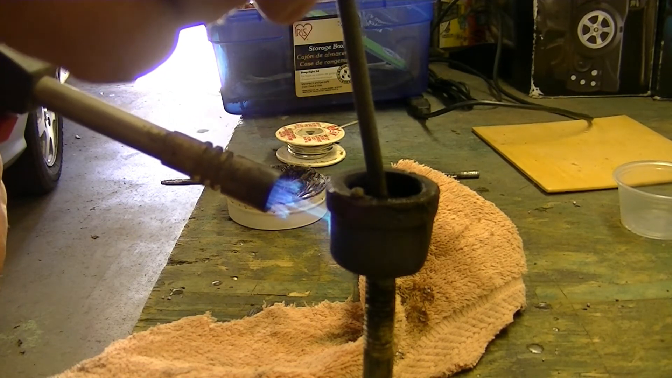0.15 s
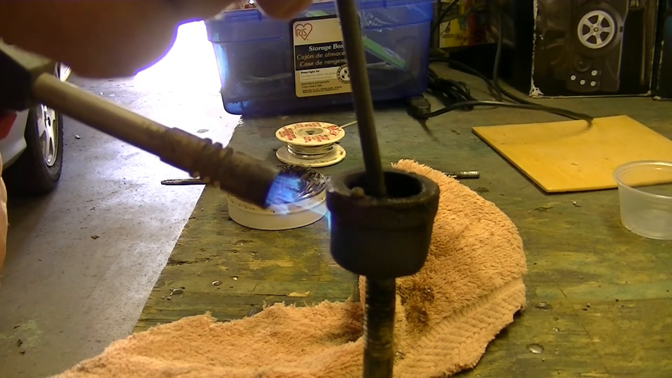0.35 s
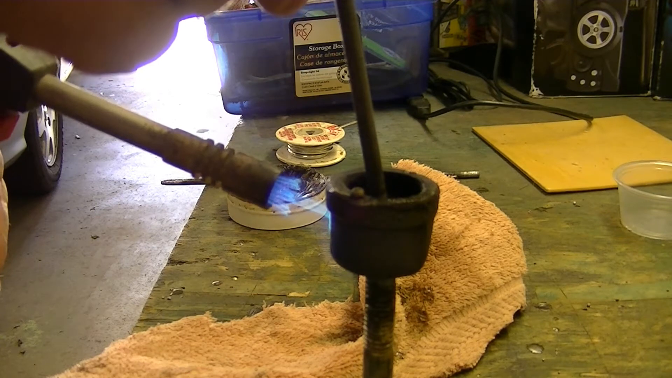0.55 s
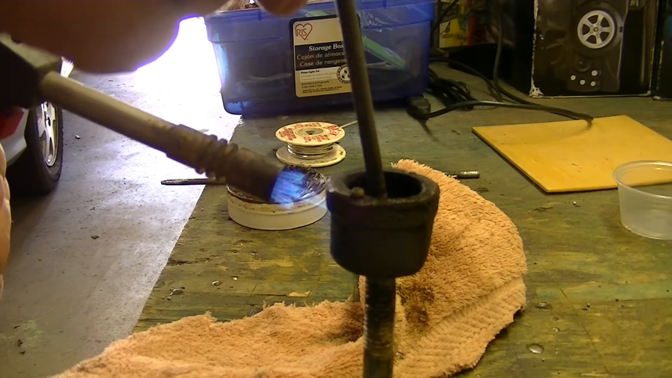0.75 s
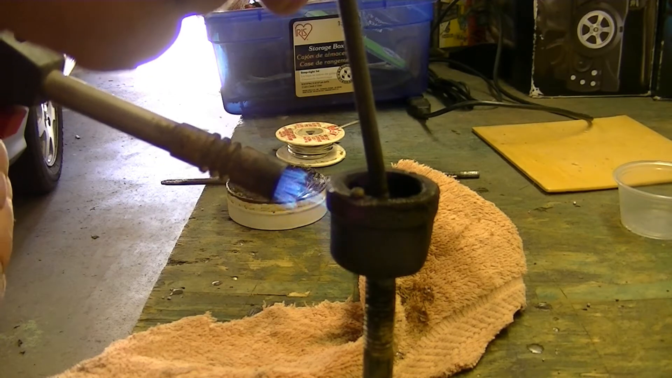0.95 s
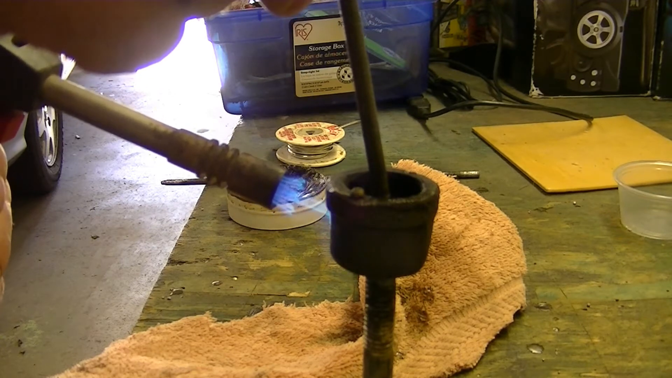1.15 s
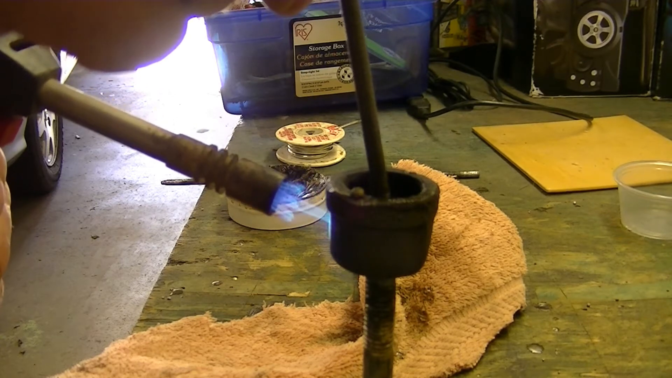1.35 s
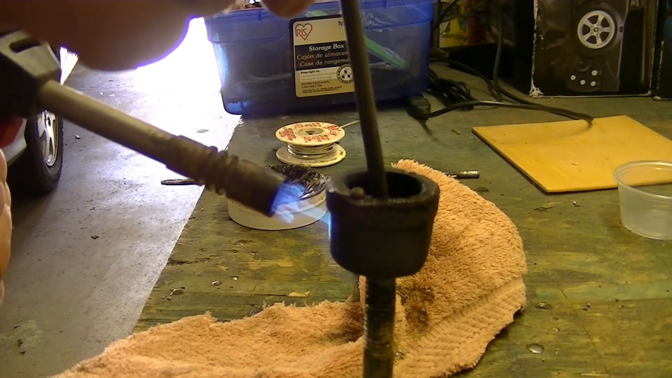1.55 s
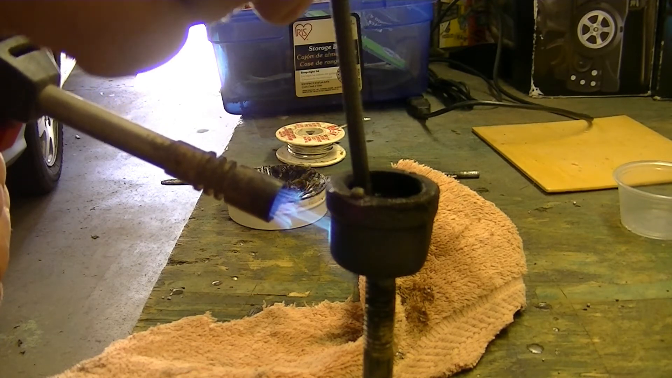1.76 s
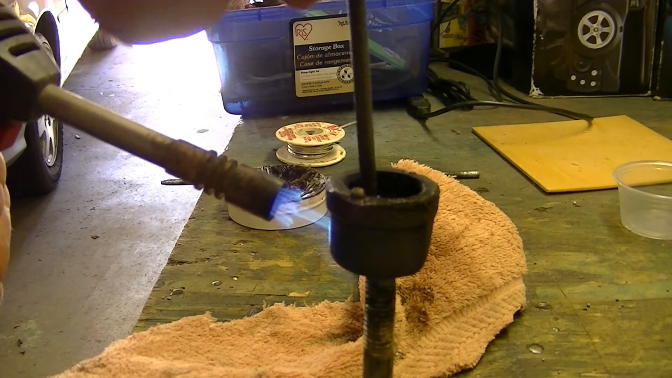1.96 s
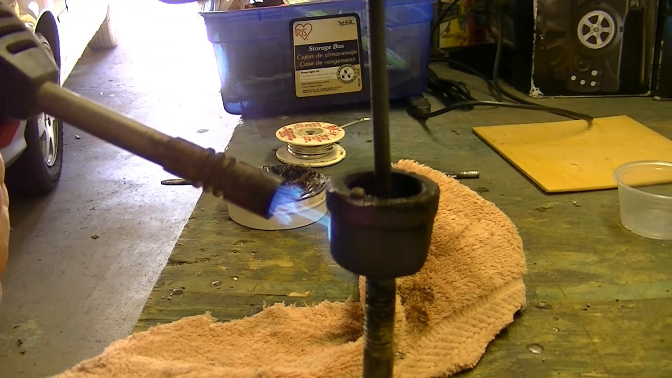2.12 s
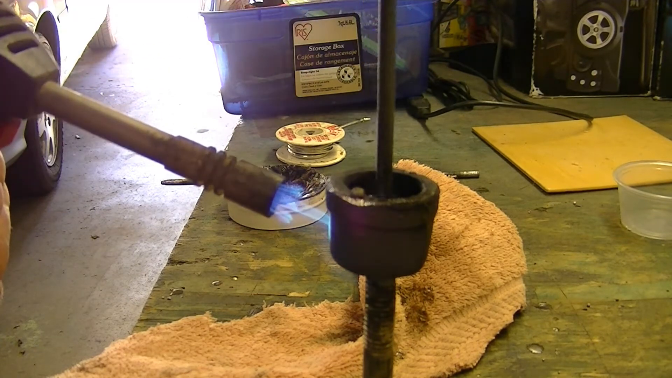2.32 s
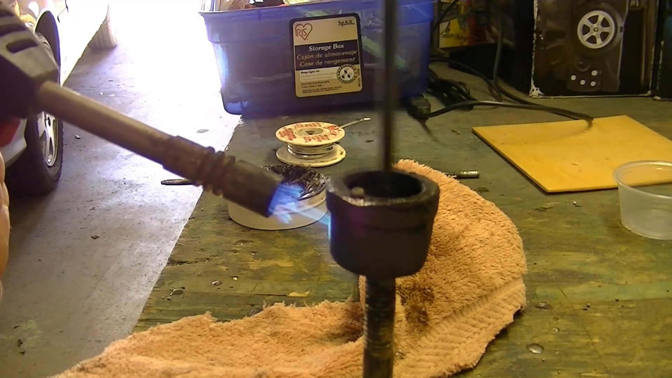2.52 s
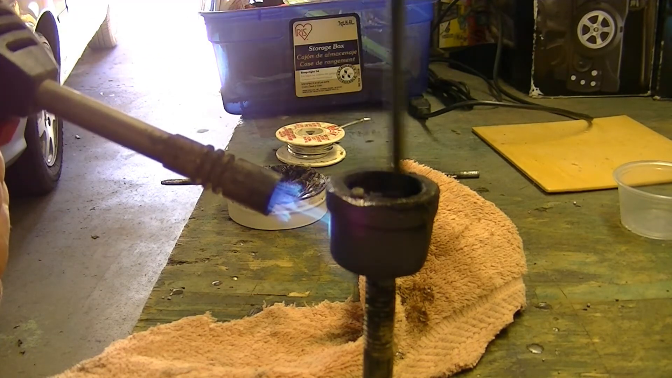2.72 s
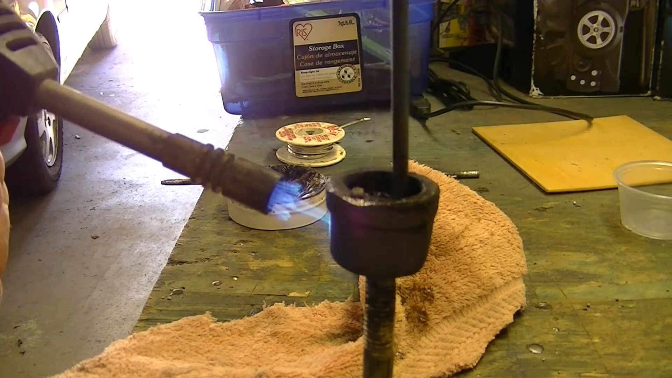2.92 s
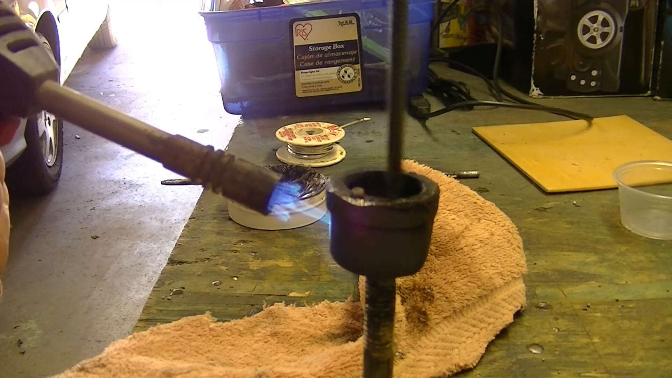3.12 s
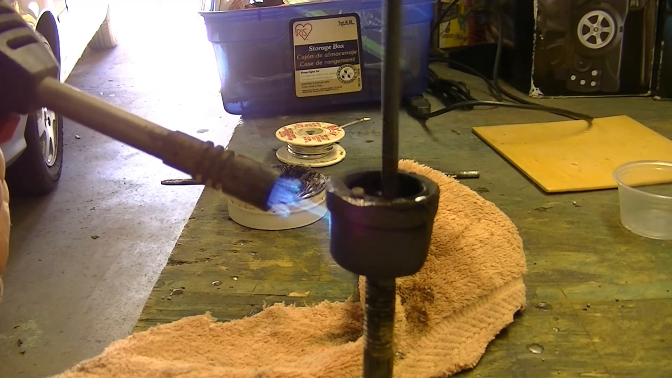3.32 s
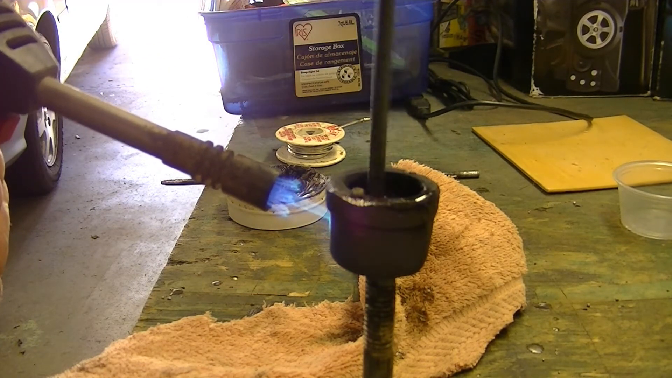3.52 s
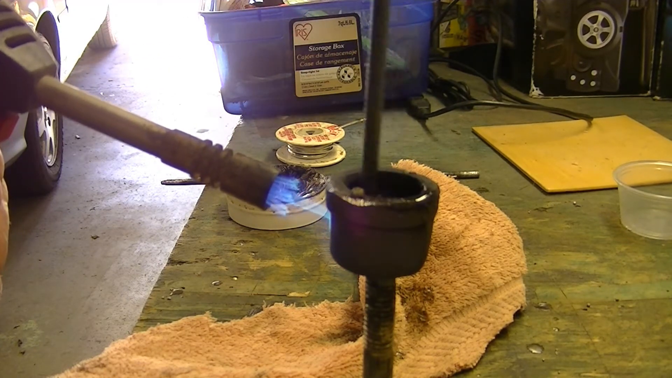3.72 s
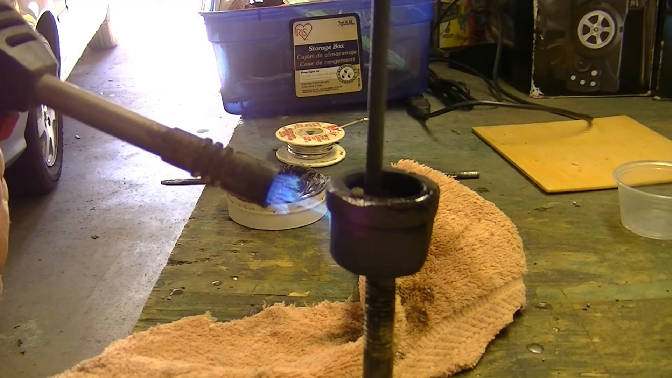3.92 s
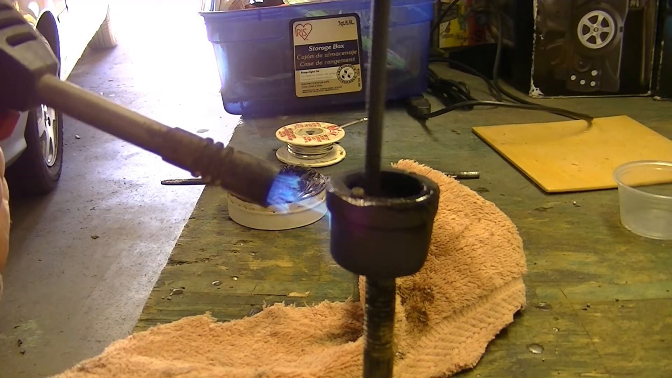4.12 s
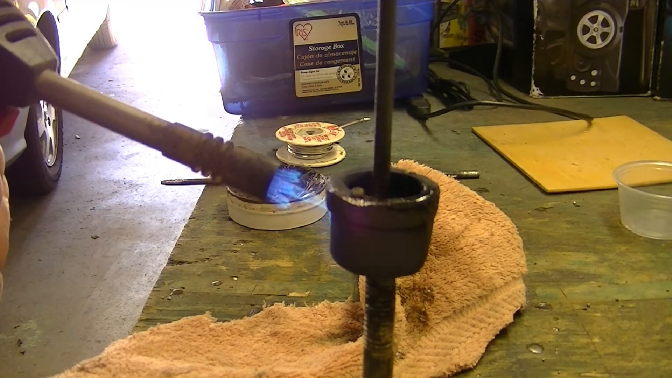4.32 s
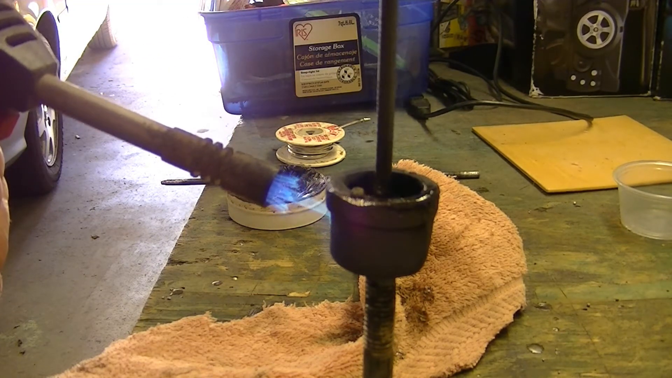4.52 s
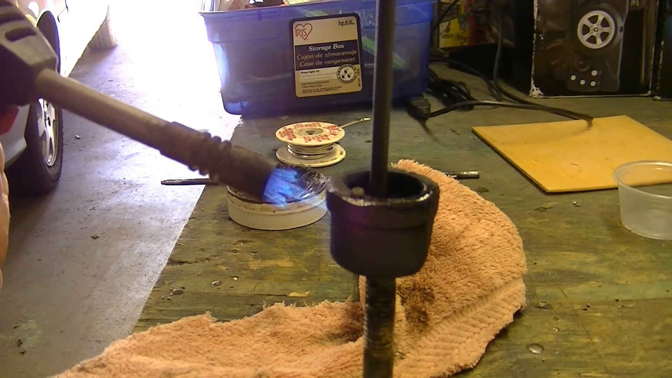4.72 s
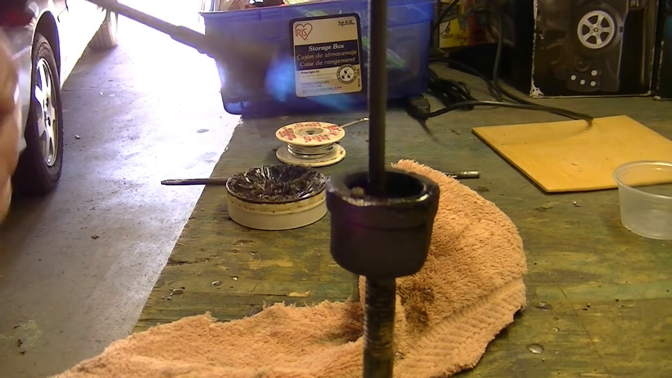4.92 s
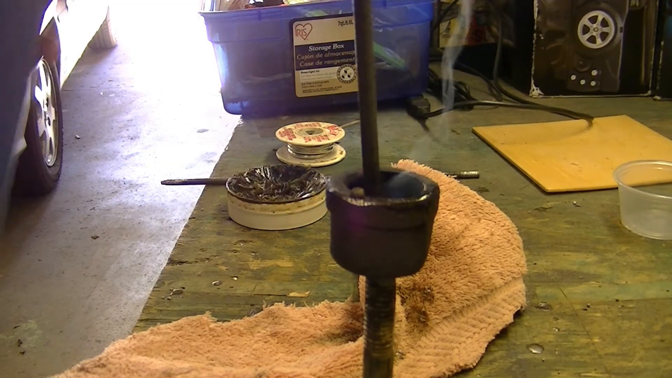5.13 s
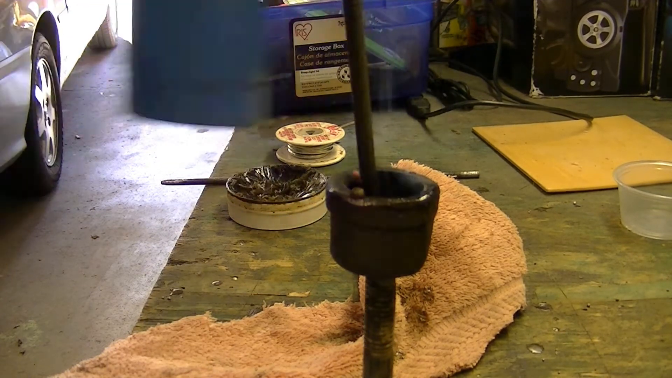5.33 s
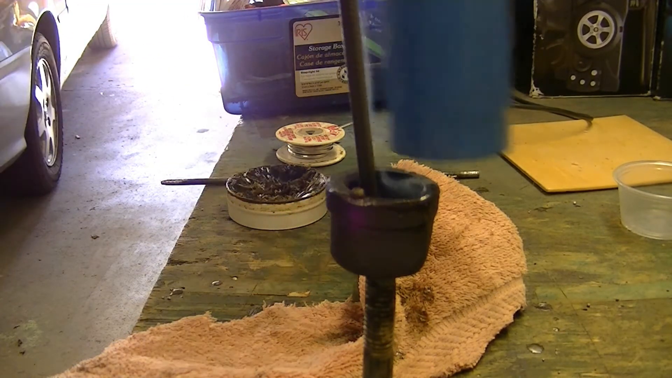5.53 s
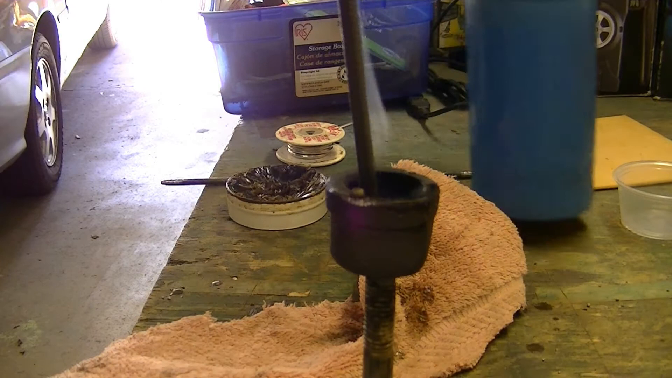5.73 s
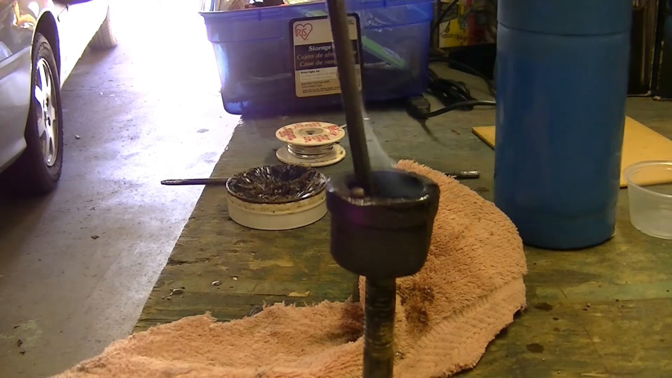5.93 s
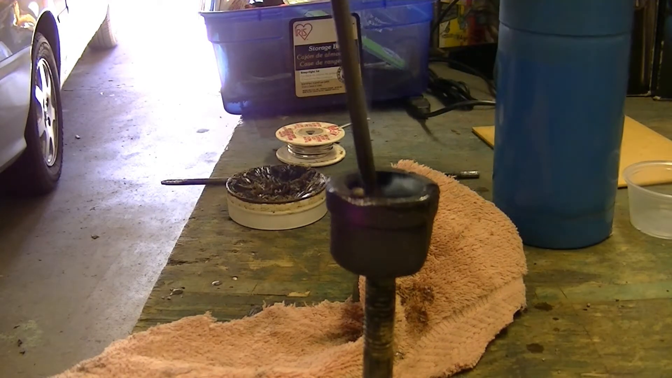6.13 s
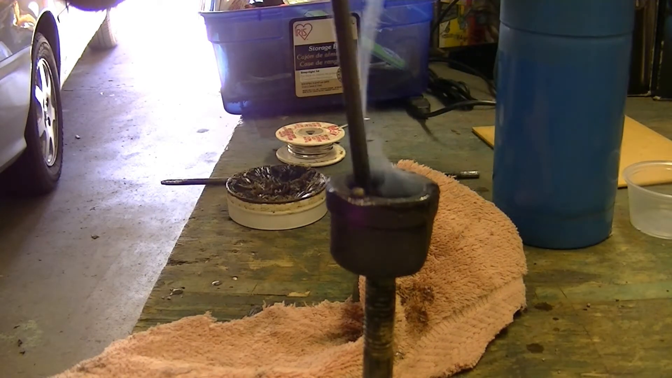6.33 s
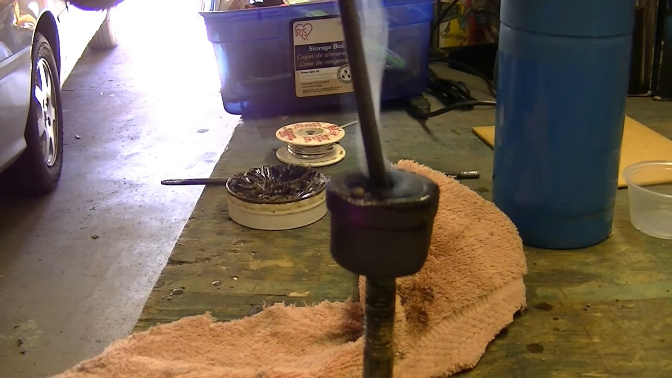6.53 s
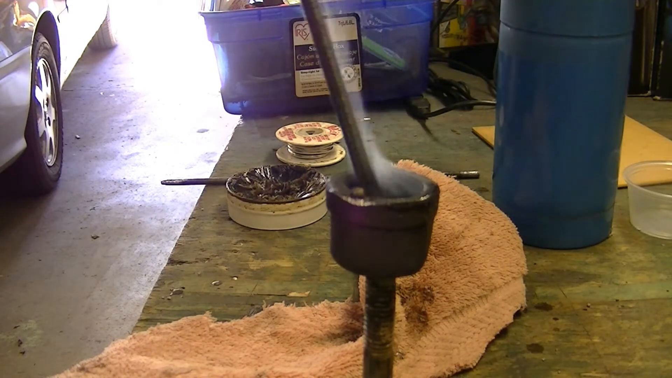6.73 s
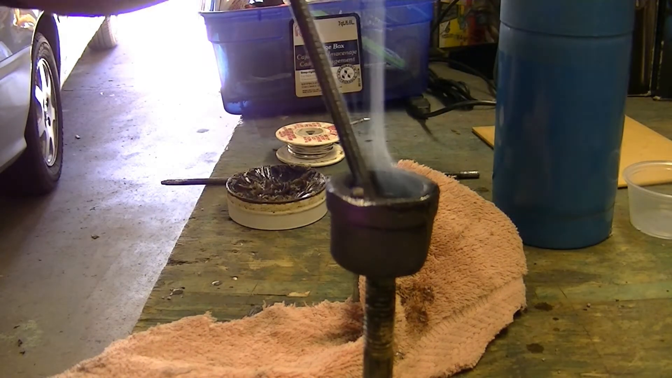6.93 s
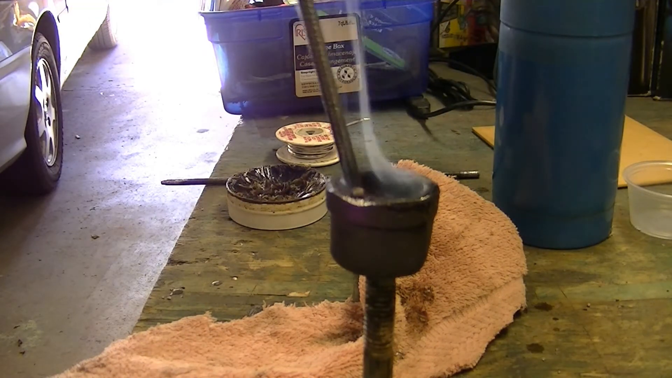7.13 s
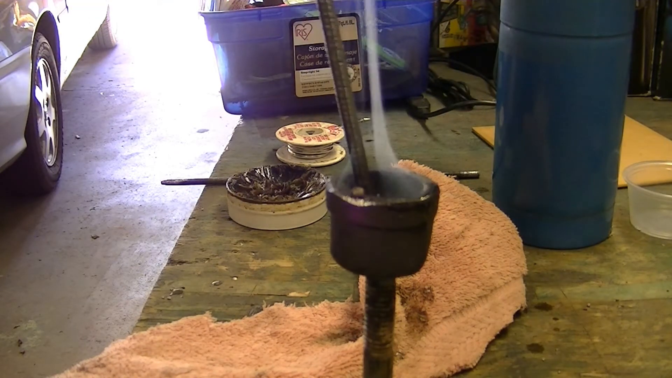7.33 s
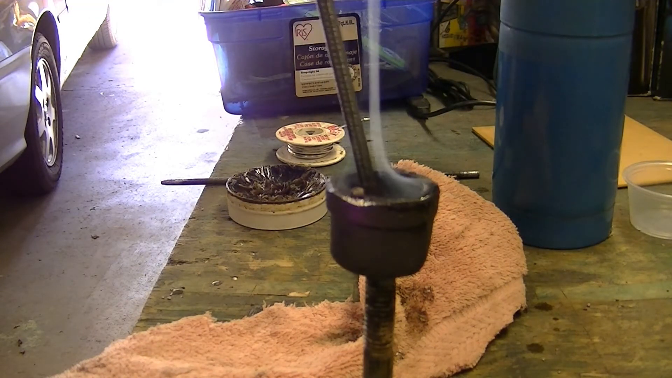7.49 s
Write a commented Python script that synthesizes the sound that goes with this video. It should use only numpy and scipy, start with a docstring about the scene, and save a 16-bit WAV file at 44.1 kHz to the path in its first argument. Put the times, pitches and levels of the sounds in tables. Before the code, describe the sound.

Steady but ragged burner roar, mid-heavy, crackling with irregular pops, one soft low bump partway. Then the hiss brightens and sweeps down in pitch as the torch is carried rightward, the roar thinning. A hard clack of metal on wood rocks quickly to rest. The burner keeps blowing at lower level, slightly wavering, with soft bench taps and tiny high sizzles from hot metal. Heard near the bench in stereo, with short workshop echo and faint microphone hiss.

```python
"""Gas torch and hot crucible

A gas torch roars and sputters against a small metal crucible on a workbench, with one soft bump.
Still burning, it is swung past the microphone and its bottle is stood on the bench with a rocking knock.
It burns on more quietly to the right, with a few soft bumps; now and then the hot metal ticks.
Flame and jet are coloured noise with pops, the knocks are short pushes that set the bench ringing,
and the ticks are short bursts of high noise."""
import sys
import numpy as np
from scipy import signal
from scipy.fft import rfft, irfft
from scipy.io import wavfile
from scipy.ndimage import map_coordinates

SR = 44100
rng = np.random.default_rng(int(sys.argv[2]) if len(sys.argv) > 2 else 0)


def dump_mix(stems):
    """Bounce the given channels to the path in sys.argv[1] as a 16-bit WAV at rate SR."""
    frames = np.atleast_2d(stems).T  # one column per channel
    limited = np.clip(frames, -1, 1)  # hard clip at full scale
    pcm = np.round(limited * 32767).astype(np.int16)
    wavfile.write(sys.argv[1], SR, pcm)


N = 333396
TIME = np.arange(N) / SR
TAPS = 4096  # length of the colouring filters, samples
BINS = np.fft.rfftfreq(TAPS, 1 / SR)  # their frequencies, Hz
MS = 1e-3  # seconds in a millisecond

# the torch's path, place 0 at the crucible, 1 in mid-air, 2 standing: t/s, place, left minus right/dB
PATH = [(4.78, 0, -0.5), (5.0, 0.33, -0.5), (5.2, 1, -2.5), (5.58, 1, -5), (5.78, 1.8, -3), (5.95, 1.9, -4)]
# loudest pops of the flame: t/s, strength/dB
POPS = [(0.169, -12.5), (0.3111, -17.5), (0.3533, -12), (0.391, -16), (0.409, -18), (0.57, -19),
        (0.6648, -17), (0.7127, -15), (0.7838, -15), (1.268, -11.5), (1.348, -12), (1.3952, -16),
        (1.4365, -16), (1.6355, -14), (1.6827, -14.5), (1.76, -18), (1.952, -11), (2.0945, -14),
        (2.14, -13), (2.5505, -14), (2.6155, -16), (2.655, -15.5), (2.7513, -12.5), (2.784, -15),
        (2.8559, -14.5), (3.109, -16), (3.2687, -14.5), (3.2906, -18), (3.438, -19), (3.88, -17),
        (4.338, -14), (4.405, -15.5), (4.586, -14), (4.6698, -13), (4.8718, -18.5), (5.059, -20.5),
        (5.1223, -20), (5.134, -20.5), (5.22, -23), (5.268, -23), (6.8793, -22)]
# the flame flares up with a burst of crackle: t/s, rise/dB
FLARES = [(0.022, 1.5), (0.192, 4), (0.361, 4), (0.41, 0), (0.469, 2), (0.573, 4.5), (0.785, 4), (1.137, 3),
          (1.19, 1.5), (1.249, 2), (1.395, 0.5), (1.442, 5.5), (1.956, 2), (1.996, 4.5), (2.3, 2.5),
          (2.341, 4), (2.453, 1.5), (2.49, 3), (2.657, 1), (2.907, 2.5), (2.99, 3.5), (3.111, 3.5),
          (3.38, 2.5), (3.808, 4.5), (4.183, 2.5), (4.222, 4), (4.59, 3.5), (4.773, 4), (5.059, 3),
          (5.127, 0), (5.167, 3.5), (5.222, 5.5), (6.708, 4), (6.96, 3), (7.274, 1.5)]
FLARE_S = 0.0096  # half length
# what slides as the torch is lifted and lowered, two resonances and a hollow band:
# t/s, low resonance f/Hz, high resonance f/Hz, hollow f/Hz
SLIDE = [(4.92, 460, 2160, 5850), (5.05, 474, 1980, 5660), (5.17, 493, 1420, 4800), (5.3, 550, 1430, 3900),
         (5.42, 600, 1470, 3650), (5.56, 640, 1520, 3750), (5.7, 710, 1750, 3800), (5.85, 710, 1830, 3750)]


def gain_of(db):
    """Turns decibels into a factor."""
    return 10 ** (np.asarray(db) / 20)


def evened(x):
    """Scales a sound to an average strength (rms) of 1."""
    return x / np.sqrt(np.mean(x ** 2) + 1e-20)


def read(points, hz):
    """Reads a table of values along a logarithmic frequency axis."""
    f, value = np.transpose(points)
    return np.interp(np.log(hz + 1), np.log(f + 1), value)


def follow(rows):
    """Gives each column of a table over time, at every sample."""
    s, *columns = np.transpose(rows)
    return [np.interp(TIME, s, c) for c in columns]


def add(mix, s, sound):
    """Adds a short sound at time s."""
    part = mix[round(s * SR):][:len(sound)]
    part += sound[:len(part)]


def bumps(rows):
    """Bell-shaped peaks and notches along the frequency axis, in dB."""
    return sum(db * np.exp(-((BINS - hz) / width) ** 2) for hz, width, db in rows)


def swells(rows, half_s):
    """Brief bell-shaped changes of level over time, in dB."""
    return sum(db * np.exp(-np.minimum(((TIME - s) / half_s) ** 2, 20)) for s, db in rows)


def ring(db):
    """Makes an impulse response with the given spectrum that starts as promptly as possible."""
    mirrored_db = np.r_[db, db[-2:0:-1]]
    log_gain = np.log(gain_of(mirrored_db))
    return np.fft.ifft(np.exp(np.conj(signal.hilbert(log_gain)))).real


def colour(x, response):
    """Passes one or two channels through an impulse response."""
    return signal.oaconvolve(np.atleast_2d(x), np.atleast_2d(response), axes=1)[:, :N]


def delayed(x, ms):
    """Delays a sound by a time that may move."""
    return map_coordinates(x, [np.arange(N) - ms * MS * SR], order=3, mode="nearest")


def resonate(x, hz, width_hz):
    """A resonance of gain 1 that follows the curve hz."""
    # shift the moving pitch down to zero, smooth there, and shift it back
    turn = np.exp(2j * np.pi * np.cumsum(hz) / SR)
    r = np.exp(-np.pi * width_hz / SR)
    return 2 * (turn * signal.lfilter([1 - r], [1, -r], x / turn)).real


def eddies(slow_hz, fast_hz):
    """Random unsteadiness, mostly between two rates, with an rms of 1."""
    f = np.fft.rfftfreq(N, 1 / SR)
    no_drift = f ** 2 / (f ** 2 + slow_hz ** 2)
    fading = np.sqrt((1 + f / slow_hz) * (1 + (f / fast_hz) ** 4))
    return evened(irfft(rfft(rng.standard_normal(N)) * no_drift / fading, N))


def turbulence():
    """Noise of churning gas, common to both ears plus a diffuse part of their own."""
    # how strong the diffuse part is: f/Hz, level/dB
    diffuse = [(50, -10), (250, -29.5), (700, -11), (1400, -3.5), (2800, -1.5), (5000, -6), (9000, -0.5),
               (12000, -13), (15000, -30)]
    own = colour(rng.standard_normal((2, N)), ring(read(diffuse, BINS)))
    return evened(rng.standard_normal(N) + own)


def shares():
    """How much of each of the three places is heard; the squares sum to 1."""
    place = follow(PATH)[0]
    return [np.sqrt(np.clip(1 - abs(place - k), 0, 1)) for k in range(3)]


def placed(spectrum, peaks):
    """Colour of a roar or hiss at the left and the right ear for one place."""
    hz, width, db, side_db = np.transpose(peaks)
    ears = []
    for side in (1, -1):
        peaks_db = bumps(zip(hz, width, db + side * side_db / 2))
        ears.append(ring(read(spectrum, BINS) + peaks_db))
    return np.array(ears) * np.sqrt(2) / np.linalg.norm(ears)


def burning():
    """The flame's strength: it flares and falters now and then, and swells just after each large pop."""
    # strength of the flame as heard, sinking as the torch is carried off: t/s, level/dB
    blaze = [(0, -37), (0.7, -37.4), (1.0, -40), (1.17, -37), (2.2, -38), (2.9, -37), (4.79, -37.5),
             (4.86, -43.5), (4.94, -38), (5.06, -42), (5.22, -42.5), (5.35, -46), (5.5, -44.5),
             (5.72, -44.5), (6.2, -44.5), (6.55, -42.5), (6.85, -43.9), (7.56, -43)]
    # the flame briefly falters: t/s, change/dB
    lulls = [(0.11, -3), (0.285, -1.5), (0.43, -4.5), (0.6, -4.5), (0.645, -3.5), (1.05, -2), (1.71, -2.5),
             (2.07, -4), (2.265, -5), (2.42, -4), (3.155, -0.5), (3.245, -4), (3.7, -2), (3.905, -3.5),
             (4.56, -3.5), (4.62, -3.5), (4.88, -3), (5.295, 0), (5.475, -1.5), (5.55, -1.5), (5.82, -3.5),
             (5.99, -1.5), (6.38, -5), (6.63, -3.5)]
    lull_s = 0.016  # half length
    afterburn_db, afterburn_s = 0.5, 0.0033
    db, = follow(blaze)
    afterburn = sum(afterburn_db * (TIME >= s) * np.exp(-abs(TIME - s) / afterburn_s) for s, _ in POPS)
    return gain_of(db + swells(lulls, lull_s) + swells(FLARES, FLARE_S) + afterburn)


def smeared(x, spacing_ms=0.4, smear=0.46):
    """Spreads each pop into a short ragged crackle without changing its colour."""
    turn = np.exp(-2j * np.pi * np.fft.rfftfreq(N, 1 / SR) * spacing_ms * MS)
    return irfft(rfft(x) * (smear + turn) / (1 + smear * turn), N)


def sliding(x):
    """Lifts the two resonances that move with the torch."""
    # width of the low and the high resonance: f/Hz
    widths_hz = (160, 210)
    # strength of the low and the high resonance: level/dB
    strengths_db = (-0.5, 2.5)
    curves = zip(follow(SLIDE), widths_hz, strengths_db)
    return x + sum(gain_of(db) * resonate(x, hz, width) for hz, width, db in curves)


def flame(flutter_db=3.0, sputter_db=-7.0, sputter_per_s=480, spread_db=3.5, pop_db=1.5, calm=0.82,
          crackle_per_flare=0.46, aimed_db=-0.5, swung_db=-3.5, standing_db=0):
    """Eddies make the burning surge; pockets of gas go off as small sharp pops."""
    # roar against the crucible, in mid-air and with the bottle standing: f/Hz, level per Hz/dB
    roar_aimed = [(30, -65), (85, -38), (160, -27), (270, -12.5), (370, -10), (450, -1), (600, -1),
                  (900, -2), (1200, -10), (2100, -10.5), (2700, -15), (3400, -23.5), (5000, -37),
                  (14000, -51)]
    roar_swung = [(30, -47), (85, -32), (160, -17), (330, -4.5), (470, 2), (750, -1.5), (1000, -5.5),
                  (1500, -1.5), (2100, -6.5), (3300, -10.5), (5000, -21), (9000, -30), (14000, -42)]
    roar_standing = [(30, -42), (85, -37), (140, -19.5), (320, -11), (520, -4), (720, -1), (900, -7),
                     (1150, -15), (1400, -10.5), (1900, -6.5), (2350, -16), (3400, -18.5), (4800, -28.5),
                     (14000, -54)]
    # peaks and notches from burner tube and nearby surfaces: f/Hz, width/Hz, level/dB, left minus right/dB
    aimed_peaks = [(304, 28, 3, -6.5), (463, 38, 4, -4.5), (610, 24, -4, -12), (670, 65, -0.5, 9.5),
                   (1062.5, 35, -21, -21), (1234, 31, 6, 3.5), (1387, 87, -8, -2), (1450, 41, 8, -1),
                   (1717, 41, -13.5, 8), (2032, 82, 4, 1), (2350, 27, 2, 3), (3200, 47, 3, -6)]
    swung_peaks = [(393, 34, -9, 4), (1130, 120, 0, -2), (2580, 210, -8.5, 0), (3130, 210, 2, -1),
                   (3820, 220, -1, -3), (4650, 220, 0.5, -10)]
    standing_peaks = [(409, 34, -19.5, -5), (476, 38, 3.5, -2), (540, 38, -12.5, 7), (620, 57, 2, 7.5),
                      (800, 62, -1, 16.5), (1050, 76, -1.5, -13), (1352, 91, 10.5, -5.5), (1510, 110, 0, 6),
                      (1806, 120, -0.5, -11), (2240, 110, -1.5, 7), (2615, 90, 7.5, -2),
                      (2880, 120, -8.5, -7), (3410, 114, 4.5, -11), (3700, 160, -6.5, -6),
                      (4000, 110, 1.5, -10)]
    # pops are brighter than the roar: f/Hz, level/dB
    snap = [(400, -2), (1500, 3.5), (3000, 6), (4200, 10.5), (5400, 13.5), (7000, 8.5), (13000, 3)]

    aimed, swung, standing = shares()
    level = burning()
    unrest = calm + (1 - calm) * aimed  # a free flame burns more evenly
    surge = evened(gain_of(flutter_db * unrest * eddies(27, 140)))

    sizes = gain_of(spread_db * np.minimum(rng.exponential(1, N), 2.8))
    pockets = sizes * (rng.random(N) < sputter_per_s / SR)
    crackle = gain_of(crackle_per_flare * swells(FLARES, FLARE_S))  # extra dB per dB of flare
    pops = gain_of(sputter_db) * evened(pockets) * np.sqrt(surge) * level * unrest * crackle
    rebound_s = 0.0004  # longest wait
    for s, db in POPS:
        size = gain_of([db + pop_db])
        add(pops, s, -size / 2)  # a large pocket swells first, then collapses
        add(pops, s + rebound_s * rng.uniform(0.41, 1), size)

    # a collapsing pocket pulls the pressure down, hence the minus
    drive = turbulence() * surge * level - colour(smeared(pops), ring(read(snap, BINS)))
    at_crucible = colour(drive, placed(roar_aimed, aimed_peaks))
    in_air = sliding(colour(drive, placed(roar_swung, swung_peaks)))
    on_bench = colour(drive, placed(roar_standing, standing_peaks))
    return (aimed * gain_of(aimed_db) * at_crucible
            + swung * gain_of(swung_db) * in_air
            + standing * gain_of(standing_db) * on_bench)


def jet(aimed_db=6, turned_db=2.0, standing_db=4.0, flutter_db=0.77, drift_db=0.6, beam=9):
    """Gas hisses through the nozzle, whose narrowly beamed resonances weaken as soon as it points away."""
    # strength of the jet as heard, peaking as the nozzle sweeps past: t/s, level/dB
    strength = [(0, -59), (3.3, -58.5), (4.84, -55.5), (4.95, -52), (5.08, -56.5), (5.45, -60),
                (5.65, -59.5), (7.56, -58)]
    # hiss aimed at the crucible, and turned away: f/Hz, level per Hz/dB
    hiss_aimed = [(500, -23), (2500, -6), (4000, -10), (5500, -3.5), (7500, 4.5), (9500, 5.5),
                  (11000, -8.5), (13000, -17.5), (14200, -4.5), (15200, -1)]
    hiss_turned = [(500, -25), (2500, -1), (4000, -0.5), (6000, 2.5), (7800, 1.5), (9800, -0.5),
                   (11000, -4), (13000, -23), (14200, -23), (15500, -22)]
    # peaks and notches from the bench once the bottle stands: f/Hz, width/Hz, level/dB, left minus right/dB
    hiss_peaks = [(4540, 130, -1, -3), (5600, 510, 1.5, -5.5), (6340, 250, 1, 14), (7050, 240, -0.5, -9),
                  (7800, 300, 5.5, 3), (8440, 110, -6, 8), (8450, 200, 0, -8), (9120, 83, 5, -6),
                  (9600, 320, -0.5, -9), (10500, 250, 1, 0)]
    # resonances of the nozzle: f/Hz, width/Hz, left level/dB, right level/dB, turned-away level/dB
    nozzle = [(4744, 250, 19.5, 23, 7), (6440, 180, -21, 8.5, 6), (7750, 150, -1.5, 7, 5),
              (8340, 160, 1.5, 0.5, 0), (8680, 240, -8, -10, -3), (9200, 210, -2.5, 9, 10),
              (10440, 270, 12, 1.5, 9), (12130, 270, 20, -18, 1), (13500, 240, 6, -10, 2)]

    at_crucible, _, standing = shares()
    aimed = at_crucible ** beam  # a high power makes a narrow beam
    turned = np.sqrt(np.clip(1 - aimed ** 2 - standing ** 2, 0, 1))
    hz, width, left_db, right_db, away_db = np.transpose(nozzle)
    ears = [bumps(zip(hz, width, db)) for db in (left_db, right_db)]
    facing = np.array([ring(read(hiss_aimed, BINS) + ear) for ear in ears])
    away = ring(read(hiss_turned, BINS) + bumps(zip(hz, width, away_db)))

    gas = turbulence() * gain_of(flutter_db * eddies(4.9, 150))
    hiss = aimed * gain_of(aimed_db) * evened(colour(gas, facing))
    hiss += turned * gain_of(turned_db) * evened(colour(gas, away))
    drifting = gain_of(standing_db + drift_db * eddies(1.9, 10))
    hiss += standing * drifting * evened(colour(gas, placed(hiss_turned, hiss_peaks)))
    return hiss * gain_of(follow(strength)[0])


def microphone_hiss(level_db=-64):
    """The microphone's own faint steady noise, unrelated in the two ears."""
    # f/Hz, level per Hz/dB
    self_noise = [(30, 2), (100, 1.5), (13000, 7.5), (15500, -12)]
    return gain_of(level_db) * evened(colour(rng.standard_normal((2, N)), ring(read(self_noise, BINS))))


def dying(x, t60s):
    """Lets each band of a sound die away at its own speed."""
    hz, t, z = signal.stft(x, SR, nperseg=128)
    fade = gain_of(-60 * t / read(t60s, hz)[:, None])
    return signal.istft(z * fade, SR, nperseg=128)[1][..., :x.shape[-1]]


def workshop(x):
    """Sparse reflections that arrive just after the direct sound."""
    # time the workshop's echo takes to fall by 60 dB: f/Hz, t60/s
    room = [(100, 0.3), (300, .2), (1000, 0.21), (3000, 0.087), (10000, 0.18)]
    taps = rng.standard_normal((2, SR // 2)) * (rng.random((2, SR // 2)) < .1)
    taps[:, :SR // 200] = 0  # silent for the first 5 ms
    tail = dying(taps, room)
    return colour(x, tail / np.linalg.norm(tail, axis=1, keepdims=True))


def knocks(level_db=0, crack_db=-13, crack_rise_s=0.00079, clack_db=3, low_hz=116, room_db=-16,
           balance_db=-3, lag_ms=0.028):
    """The bottle's rim touches, lands and rocks flat; soft bumps stir only the low modes."""
    # blows on the bench: t/s, strength/dB, contact time/ms
    blows = [(2.151, -21, 3.9), (5.856, -23, 0.073), (5.8594, -0.5, 0.17), (5.8608, -11, 0.068),
             (5.8631, -5.5, 0.93), (5.8678, -16, 0.99), (5.8741, -8.5, 1.2), (5.881, -20, 0.72),
             (5.906, -20, 1.6), (5.929, -23, 1.8), (5.939, -23, 0.35), (6.32, -26.5, 1.11),
             (6.524, -27, 0.86), (6.559, -24, 2.5), (7.173, -25, 4.64)]
    # what bench and bottle ring with: f/Hz, level/dB, t60/s
    bench = [(114, -37, 0.18), (145, -39, 0.17), (206, -29.5, 0.13), (252, -41, 0.093), (292, -26.5, 0.16),
             (335, -31, 0.15), (468, -21, 0.095), (663, -23.5, 0.072), (675, -21.5, 0.06),
             (1100, -23, 0.064), (1240, -21.5, 0.038), (1390, -14, 0.018), (2047, -11.5, 0.016),
             (2580, -14.5, 0.016), (3520, -21, 0.022), (4250, -19, 0.014), (4650, -13, 0.012),
             (5400, -20, 0.012)]
    # the dense crack of steel on wood, dying into a thud: f/Hz, level per Hz/dB, t60/s
    crack_bands = [(120, -3, 0.17), (377, -2.5, 0.13), (850, -3.5, 0.1), (1330, 1, 0.035),
                   (1890, -3, 0.016), (2600, -4, 0.028), (3300, -3, 0.043), (5000, -7, 0.022),
                   (6500, -16, 0.034), (7900, -7, 0.042), (8700, 0, 0.043), (10600, 0, 0.037),
                   (12600, -4, 0.031), (15000, -13, .02)]
    # the first sharp clack of the steel rim: f/Hz, level/dB
    clack = [(200, -18), (700, 0), (1400, 7), (2300, 8), (3000, -7), (4400, 4), (5400, 1), (6300, -14),
             (9000, -7), (15000, -23)]

    t = np.arange(SR // 2) / SR
    force = np.zeros(N)
    for s, db, contact_ms in blows:
        rise = t / (contact_ms * MS / 5)  # the push peaks after a fifth of the contact
        push = rise * np.exp(-rise)
        add(force, s, gain_of(db) * push / push.sum())

    modes = sum(gain_of(db - 60 * t / t60) * np.sin(2 * np.pi * hz * t) for hz, db, t60 in bench)
    hz, db, t60 = np.transpose(crack_bands)
    noise = colour(rng.standard_normal(N), ring(read(np.c_[hz, db], BINS)))
    crack = dying(evened(noise[0, -len(t):]), np.c_[hz, t60])
    body = modes + gain_of(crack_db) * (1 - np.exp(-t / crack_rise_s)) * crack
    add(body, 0, gain_of(clack_db) * ring(read(clack, BINS)))

    no_bass = signal.butter(6, low_hz, "high", fs=SR, output="sos")
    knock = gain_of(level_db) * signal.sosfilt(no_bass, colour(force, body)[0])
    left = delayed(knock, lag_ms) * gain_of(balance_db / 2)
    right = knock * gain_of(-balance_db / 2)
    return np.array([left, right]) + gain_of(room_db) * workshop(knock)


def ticks(width_hz=900, swell_s=0.002):
    """Tiny bright sizzles from the heated metal: bands of noise that swell and fade."""
    # t/s, strength/dB, f/Hz
    tick_list = [(2.232, -51.5, 12500), (3.465, -39, 10100), (6.998, -48.5, 14500), (7.33, -53.5, 13000),
                 (7.45, -47, 12530)]
    rise = np.arange(TAPS) / SR / swell_s
    out = np.zeros(N)
    for s, db, hz in tick_list:
        band = 1 + ((BINS - hz) / width_hz) ** 4
        fizz = evened(irfft(rfft(rng.standard_normal(TAPS)) / band))
        add(out, s, gain_of(db) * rise * np.exp(-rise) * fizz)
    return out


def swish(uneven_db=2, swish_s=0.06):
    """Bands of hiss swell unevenly and sink in pitch as the nozzle swings past."""
    # t/s, f/Hz, width of each of two filter passes/Hz, level/dB, glide/(Hz per s)
    bands = [(4.93, 3270, 1100, -50, -2000), (4.94, 8900, 1100, -53, -800), (4.95, 10600, 450, -62.5, -500),
             (4.96, 13800, 3000, -64, -500), (4.98, 5000, 1200, -51.5, -3000),
             (5.02, 6550, 800, -57, -1200)]
    gas = turbulence() * evened(gain_of(uneven_db * eddies(15, 90)))
    out = 0
    for s, hz, width_hz, db, glide in bands:
        centre = hz + glide * np.clip(TIME - s, -.5, .5)
        band = resonate(resonate(gas, centre, width_hz), centre, width_hz)
        out = out + gain_of(db) * np.exp(-((TIME - s) / swish_s) ** 2 / 2) * evened(band)
    return out


def hollowed(sound, swing_at_s=4.98, swing_s=0.35, full_depth=0.58, width_hz=470, ratio=1.27):
    """Around the swing, the reflection off the bench partly cancels two sliding bands."""
    depth = full_depth * np.exp(-((TIME - swing_at_s) / swing_s) ** 2 / 2)
    hz = follow(SLIDE)[2]
    for centre in (hz, hz * ratio):  # the second band lies higher
        sound = np.array([x - depth * resonate(x, centre, width_hz) for x in sound])
    return sound


def torch(echo_share=0.13, waver_ms=2.6, waver_depth=0.058, lag_ms_per_place=0.034):
    """Flame and jet travel to the right; once the flame burns free, its colour wavers slowly."""
    place, balance_db = follow(PATH)
    # an echo of slowly moving delay makes the waver
    echo = echo_share * shares()[2]
    echo_ms = waver_ms * np.exp(waver_depth * eddies(0.41, 2.2))
    burner = hollowed(flame() + jet() + swish())
    left, right = [x + echo * delayed(x, echo_ms) for x in burner]
    # the left ear hears the torch later the further right it goes
    left = delayed(left, lag_ms_per_place * place)
    return np.array([left * gain_of(balance_db / 2), right * gain_of(-balance_db / 2)])


def scene():
    """Torch, bench and crucible together, with the microphone's noise."""
    return torch() + knocks() + ticks() + microphone_hiss()


def record(dry, edge_hz=15700):
    """The recorder's band limit: it removes what lies above the edge."""
    low_pass = signal.firwin(511, edge_hz, window=("kaiser", 9), fs=SR)
    return signal.oaconvolve(dry, low_pass[None], "same")


dry = scene()
out = record(dry)
dump_mix(out)
```